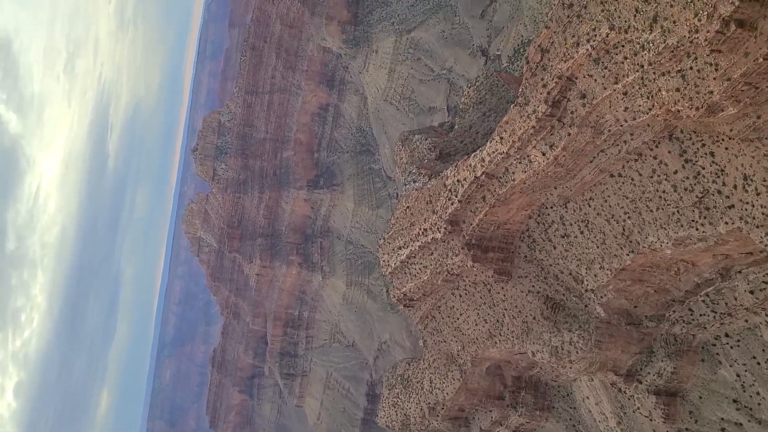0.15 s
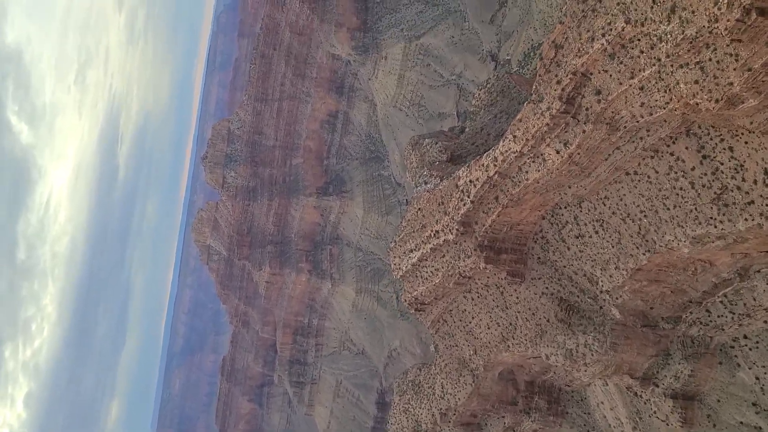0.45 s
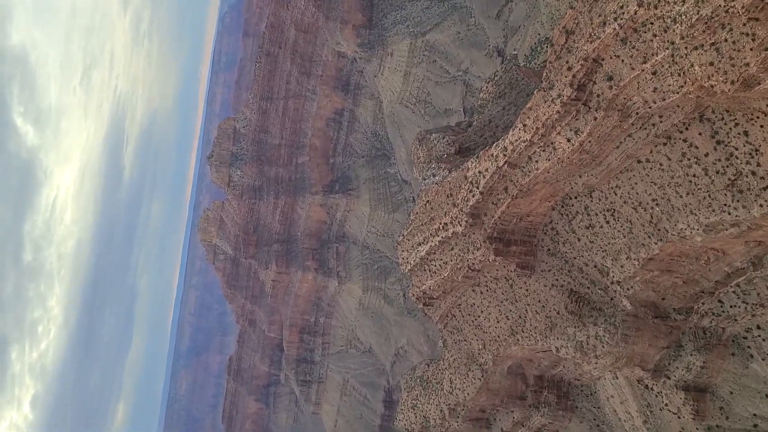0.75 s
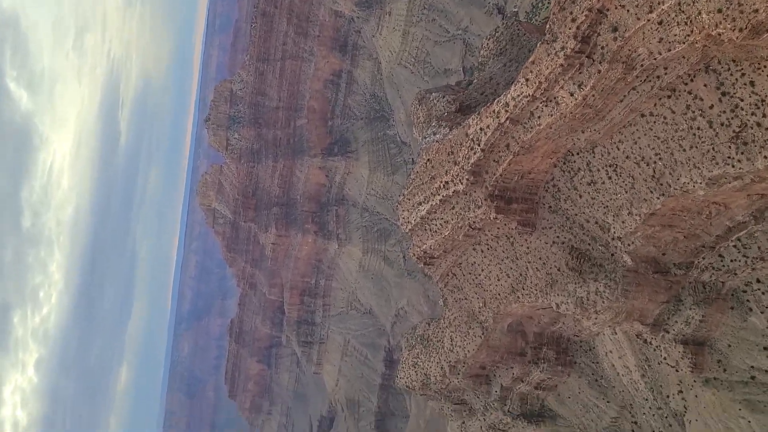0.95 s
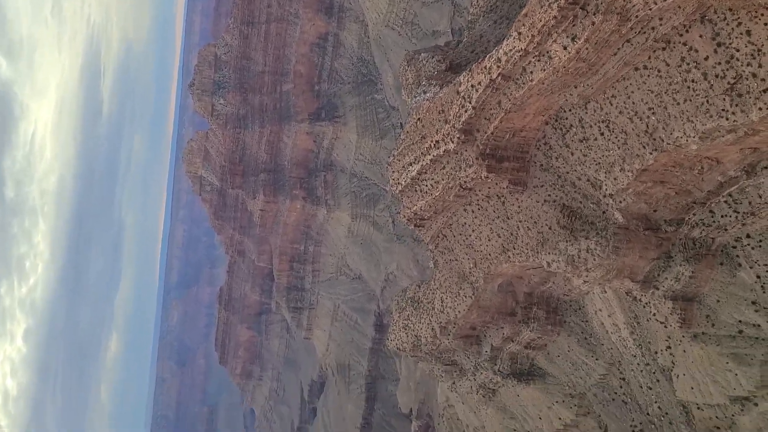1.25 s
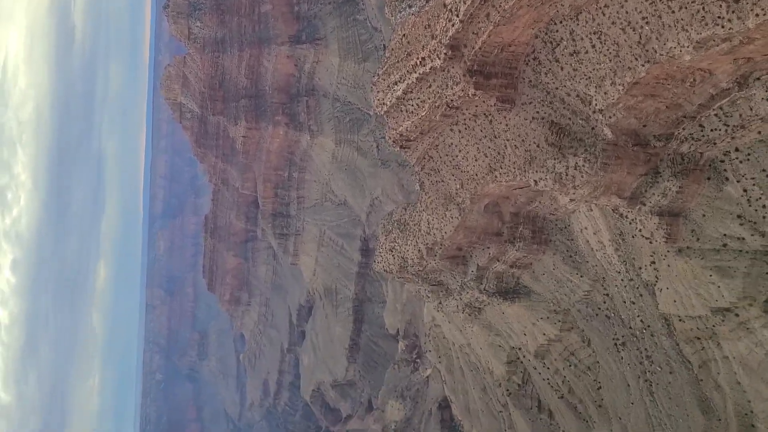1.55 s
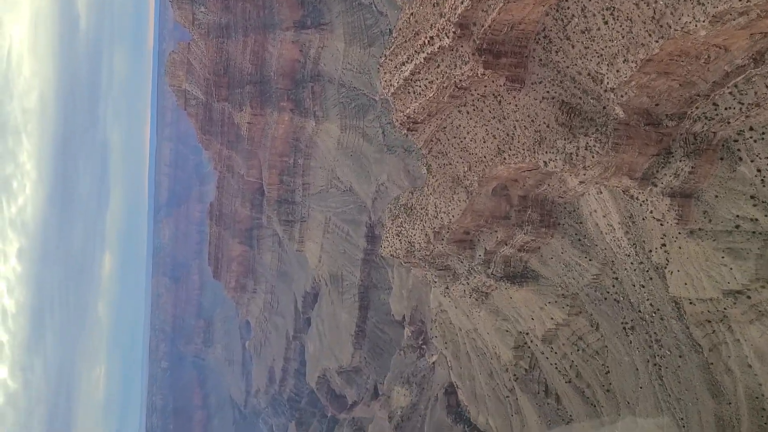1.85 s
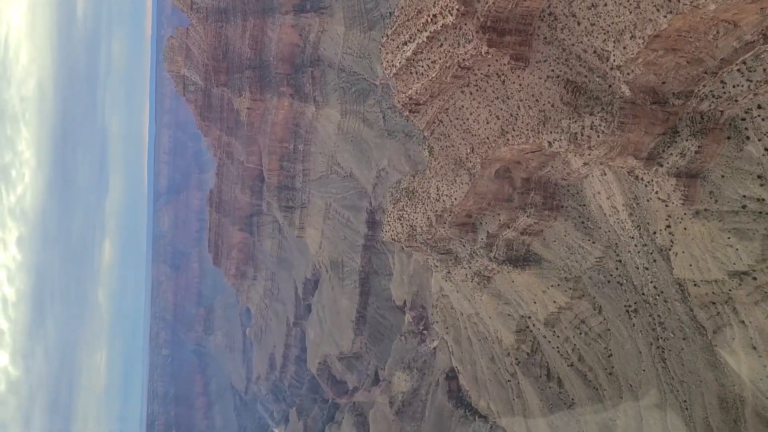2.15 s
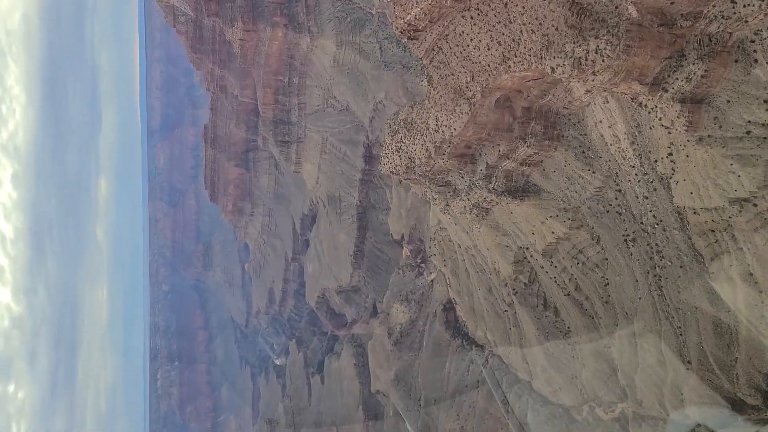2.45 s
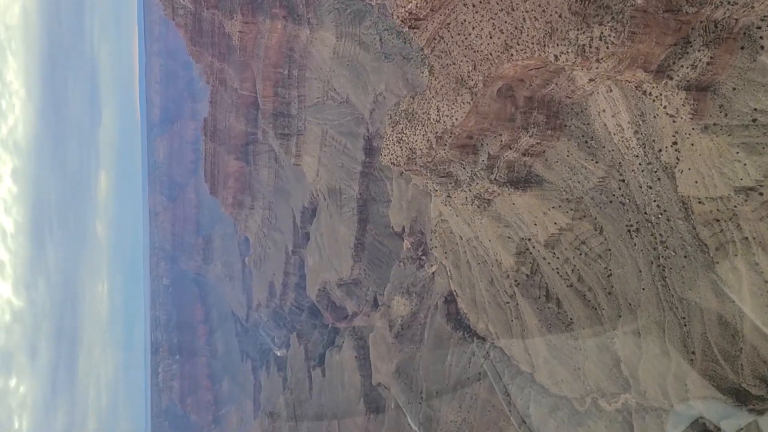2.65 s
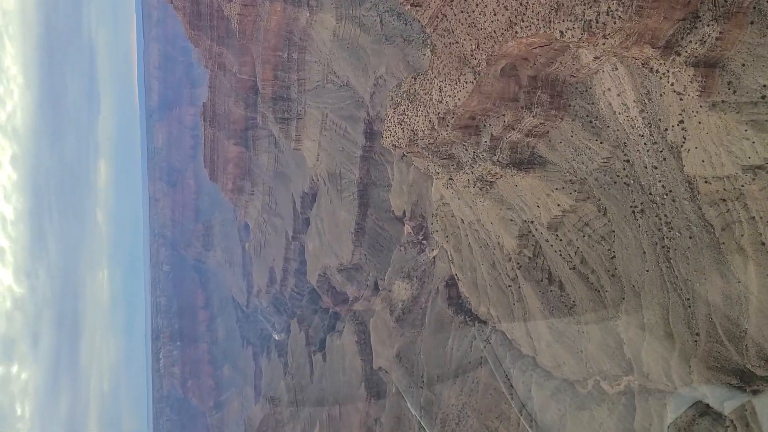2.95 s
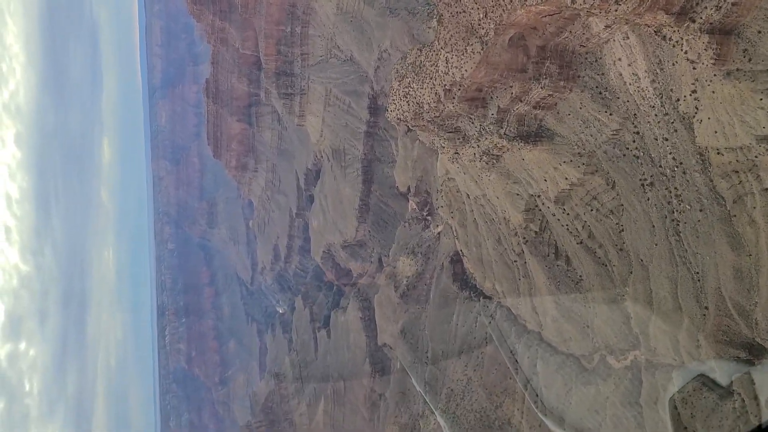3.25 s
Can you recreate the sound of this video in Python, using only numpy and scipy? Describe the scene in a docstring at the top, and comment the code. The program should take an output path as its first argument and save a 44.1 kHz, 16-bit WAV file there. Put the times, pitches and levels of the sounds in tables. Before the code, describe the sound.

Inside a helicopter cabin in level flight, the rotor blades beat in a low, constant rumble. Engine roar and rushing air surround the microphone throughout, while the gears sing faintly and a thin, very high whine sits on top.

```python
"""A deep, steady thump and drone under a wide roar: a helicopter cabin in level flight.
Three rotor blades push and pull on the cabin air, and the tail and drive shafts hum and beat against them.
Meshing gear teeth sing above that, throbbing once a rotor turn, with a thin turbine whine on top.
Slipstream and engine roar fill the rest, fluttering a little as each blade passes."""
import sys
import numpy as np
from scipy import signal
from scipy.fft import rfft, irfft, next_fast_len
from scipy.io import wavfile
from scipy.ndimage import uniform_filter1d

SR = 44100
rng = np.random.default_rng(int(sys.argv[2]) if len(sys.argv) > 2 else 0)


def persist_wave(psi):
    """Save psi, clipped to +-1, as 16-bit WAV."""
    counts = np.round(np.clip(psi, -1, 1) * 32767).astype(np.int16)
    wavfile.write(sys.argv[1], SR, np.atleast_2d(counts).T)


N = 149940
TIME = np.arange(N) / SR
BLADES = 3
THROB_LAG = .24  # rotor turns to the tight spot of the ring gear


def gain_of(db):
    return 10 ** (np.asarray(db) / 20)


def unit_rms(x):
    return x / np.sqrt(np.mean(x ** 2) + 1e-20)


def wander(top_hz, t=TIME):
    """A random drift of rms about 1: sines from 0.3 Hz up to top_hz, the slowest strongest."""
    hz, phase = np.geomspace(.3, top_hz, num=16), rng.random(16)
    coarse = np.linspace(0, N / SR, num=600)
    drift = np.sin(2 * np.pi * (hz * coarse[:, None] + phase)) @ hz ** -.5
    return np.interp(t, coarse, unit_rms(drift))


def tone(cycles, db, lead_rad, waver_db=0.):
    """A stereo sine whose level can waver; db is (left, right) rms, and the left leads by lead_rad."""
    pair = np.cos(2 * np.pi * cycles + np.array([[lead_rad], [0]]))
    return np.sqrt(2) * gain_of(np.reshape(db, (2, -1)) + waver_db * wander(4.01)) * pair


def rotor_turns():
    """The running count of turns of the main rotor, its speed almost steady."""
    # Rotor speed. Each row: time in seconds, turns per minute.
    speed = [(0, 393.6), (.7, 393.81), (1.0, 393.76), (1.3, 393.61), (1.6, 393.55), (1.9, 393.62),
             (2.2, 393.6), (2.8, 393.76), (3.4, 393.78)]
    return np.cumsum(np.interp(TIME, *np.transpose(speed))) / (60 * SR)


def roar_bed():
    """Steady slipstream and engine noise: dark, centred in the bass and wide in the treble."""
    # Colour of the roar. Each row: frequency in Hz, left and right density in dB (power per Hz),
    # left-right correlation.
    spectrum = [(15, -51, -54, .99), (30, -50, -53, .99), (50, -41.5, -44, 0.69), (64, -37.5, -39.5, 0.96),
                (83, -37.5, -37.5, 0.96), (116, -41, -42, 0.92), (155, -45.5, -47.5, 1),
                (194, -47.5, -45.5, 0.86), (244, -44.5, -43.5, 0.97), (285, -48, -46, 0.93),
                (316, -50, -49.5, 0.35), (339, -49, -51, 0.27), (374, -47, -47.5, 0.85),
                (413, -48.5, -52.5, 0.46), (445, -49.5, -54, 0.6), (513, -50, -51, 0.38),
                (580, -50, -54.5, 0.5), (620, -52, -54, 0.51), (687, -49, -53.5, 0.78),
                (702, -53.5, -53.5, 0.096), (747, -52, -53.5, -0.017), (886, -55, -61.5, -0.42),
                (893, -53.5, -55, -0.25), (957, -53, -56, -0.52), (1054, -55, -58, -0.57),
                (1237, -57, -57.5, -0.5), (1307, -53.5, -59, -0.41), (1335, -61, -68, -0.33),
                (1353, -51.5, -46.5, 0.2), (1392, -53, -59, 0.42), (1450, -61, -64.5, -0.46),
                (1560, -58.5, -73, -0.81), (1655, -64.5, -60.5, 0.33), (1900, -65, -66, -0.054),
                (2400, -66.5, -69.5, -0.34), (2870, -65.5, -67.5, -0.27), (3380, -68, -74, 0.092),
                (3450, -69, -71.5, -0.54), (3450, -75, -72.5, -0.063), (4240, -75, -74.5, -0.13),
                (5230, -78, -80.5, -0.14), (5700, -78, -77.5, -0.044), (6900, -76, -80.5, -0.043),
                (8260, -80, -77.5, -0.21), (9700, -79.5, -76.5, 0.17), (10700, -78.5, -75.5, -0.12),
                (11100, -78, -74, -0.028), (11220, -76, -72, -0.075), (11350, -78, -73.5, -0.0041),
                (11800, -79, -74, 0), (12200, -80.5, -75.5, 0.055), (14200, -81.5, -80, 0),
                (15700, -82, -79, 0)]
    row_hz, *columns = np.transpose(spectrum)
    size = next_fast_len(N)
    log_hz = np.log(np.fft.rfftfreq(size, 1 / SR) + 1)
    left_db, right_db, likeness = (np.interp(log_hz, np.log(row_hz), column) for column in columns)
    likeness = np.clip(likeness, -1, 1)
    left, unrelated = rfft(rng.standard_normal((2, size)))
    right = likeness * left + np.sqrt(1 - likeness ** 2) * unrelated
    colour = gain_of([left_db, right_db]) * np.sqrt(SR / 2)
    return irfft(np.array([left, right]) * colour, size)[:, :N]


def roar(rotor):
    """The noise bed, stirred by gusts, passing blades and a panel that throbs with the ring gear."""
    # Flutter at the blade rate. Each row: frequency in Hz, level swing in dB.
    flutter_depths = [(150, 1.4), (1000, 0), (2500, -0.3), (7000, 0), (10000, 0.7), (14000, 0.5)]
    panel_hz, panel_width_hz, flutter_lead_turns = 1360, 50, .02
    hz, t, bands = signal.stft(roar_bed(), SR, nperseg=512, noverlap=384)
    turns = np.interp(t, TIME, rotor)
    # Patches are narrow in pitch and linger; gusts are broad and brief.
    chance = rng.standard_normal((len(t), len(hz))).T
    patches = unit_rms(uniform_filter1d(uniform_filter1d(chance, 6, axis=0), 20, axis=1))
    gusts = unit_rms(uniform_filter1d(uniform_filter1d(chance[::-1], 70, axis=0), 8, axis=1))
    hz = hz[:, None]
    swell = wander(2.4, t)
    treble_swell = wander(6, t) / (1 + (11000 / (hz + 1)) ** 8)  # the hiss above 11 kHz
    flutter_hz, depth_db = np.transpose(flutter_depths)
    swing_db = np.interp(np.log(hz + 1), np.log(flutter_hz), depth_db)
    flutter_db = swing_db * np.cos(2 * np.pi * BLADES * (turns + flutter_lead_turns))
    panel_band = np.exp(-((hz - panel_hz) / panel_width_hz) ** 2 / 2)
    panel_throb = panel_band * np.cos(2 * np.pi * (turns - THROB_LAG))
    db = .5 * patches + .45 * gusts + .15 * swell + .5 * treble_swell + flutter_db + 1.6 * panel_throb
    return signal.istft(bands * gain_of(db), SR, nperseg=512, noverlap=384)[1][:, :N]


def turbine(rotor):
    """The compressor's thin whine, shaken by each rotor blade, with a sideband a shaft rate either side."""
    # Swells of the whine. Each row: time in seconds, level on the right in dB.
    swells = [(0, -45), (.3, -46), (.62, -43.5), (.9, -49), (1.2, -51), (1.4, -56), (1.5, -47), (1.8, -45),
              (1.92, -54), (2.08, -52), (2.15, -45), (2.4, -43.5), (2.7, -49), (2.95, -48), (3.2, -50),
              (3.4, -47)]
    whine_hz, wander_hz, shaft_hz, shake_cycles = 11217.3, 2.2, 539, .075
    pan_db, rough_db = np.array([[-11], [0]]), 1.6
    cycles = np.cumsum(whine_hz + wander_hz * wander(12.3)) / SR
    cycles += shake_cycles * np.cos(2 * np.pi * BLADES * rotor)
    level_db = np.interp(TIME, *np.transpose(swells))
    sidebands = sum(tone(cycles + offset_hz * TIME, pan_db + level_db.mean() + db, lead_rad=2, waver_db=3)
                    for offset_hz, db in ((-shaft_hz, -13.5), (shaft_hz, -9)))
    return tone(cycles, pan_db + level_db + rough_db * wander(40), lead_rad=2) + sidebands


def gears(rotor):
    """Ring gear teeth sing in harmonics that throb and warble as the tight spot comes round."""
    # Gear mesh tones. Each row: harmonic of the tooth rate, left and right base level in dB,
    # left lead in radians, drift of the right level in dB per second, throb depth.
    mesh = [(1, -35, -37, -3.0, 0, .1), (2, -42.5, -38.5, -.5, 0, 1.9), (4, -45.5, -56, -1.0, 0, .1),
            (5, -43.5, -44, .7, -1.5, .15), (6, -55, -49.5, -1.5, -2.5, .1),
            (7, -56.5, -55.5, -3.0, -3.5, .1), (8, -54.5, -59, -.9, -2.0, .1)]
    # Swell of the fifth harmonic. Each row: time in seconds, added level in dB.
    fifth_swell = [(0, -1), (.15, 1.5), (.75, 4), (1.15, -1.5), (1.9, -.5), (2.2, -2.5), (3.4, -2.5)]
    teeth, flicker_db, warble_cycles = 100, 1.3, .07
    tightness = np.cos(2 * np.pi * (rotor - THROB_LAG))
    out = tone(260 * rotor, (-51, -61), lead_rad=0, waver_db=1.05)  # a faint tone to the left
    for harmonic, left_db, right_db, lead_rad, drift, depth in mesh:
        db = np.array([np.full(N, left_db), right_db + drift * (TIME - TIME[-1] / 2)])
        db += flicker_db * wander(24.7)
        if harmonic == 5:
            db += np.interp(TIME, *np.transpose(fifth_swell))
        throb = depth * tightness
        cycles = harmonic * teeth * rotor - warble_cycles * throb + rng.random()
        out += (1 + throb) * tone(cycles, db, lead_rad, waver_db=0 if harmonic == 5 else 1.05)
    return out


def shafts(rotor):
    """Tail and drive shafts hum once a turn; the drive pinion sings at its tooth rate, slowly rising in level."""
    tail_ratio, drive_ratio = 9.245, 15.55  # shaft turns per rotor turn
    tail_lag_turns, pinion_teeth = .32, 17
    drive = drive_ratio * rotor
    tail_hum = tone(tail_ratio * rotor - tail_lag_turns, (-23.5, -23.5), lead_rad=0, waver_db=.8)
    drive_hum = tone(drive, (-28, -28), lead_rad=0, waver_db=.8)
    rise_db = TIME - N / SR / 2  # 1 dB a second
    pinion = tone(pinion_teeth * drive, (rise_db - 50, rise_db - 42), lead_rad=-.7, waver_db=1.05)
    return tail_hum + drive_hum + pinion


def blades(rotor):
    """Each blade pushes and pulls the air in a thump; the second harmonic is the cabin's drone."""
    # Weight of the thump. Each entry: level in dB of one harmonic of the blade rate, from the first up.
    thump_db = [-36, -14.8, -23.5, -24, -29, -42, -38]
    lag_turns = .107  # until the first blade passes overhead
    passes = BLADES * (rotor - lag_turns)
    return sum(tone(k * passes + 1 / 4, (db, db), lead_rad=-.08, waver_db=1.14 if k == 2 else .3)
               for k, db in enumerate(thump_db, start=1))


def scene():
    """Five layers, all moving in time with the one rotor."""
    rotor = rotor_turns()
    return roar(rotor) + blades(rotor) + shafts(rotor) + gears(rotor) + turbine(rotor)


def record(dry):
    """The microphone rounds off the peaks, then a steep low-pass trims the very top."""
    ceiling, cutoff_hz = 2.2, 15750
    soft = ceiling * np.tanh(dry / ceiling)
    low_pass = signal.firwin(2047, cutoff_hz, window=("kaiser", 10), fs=SR)
    return signal.oaconvolve(soft, low_pass[None], "same")


dry = scene()
out = record(dry)
persist_wave(out)
```